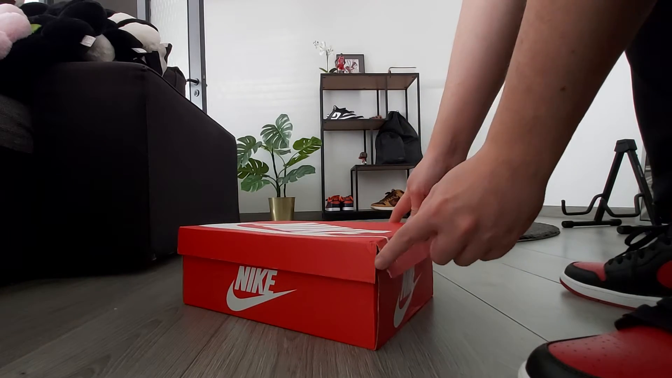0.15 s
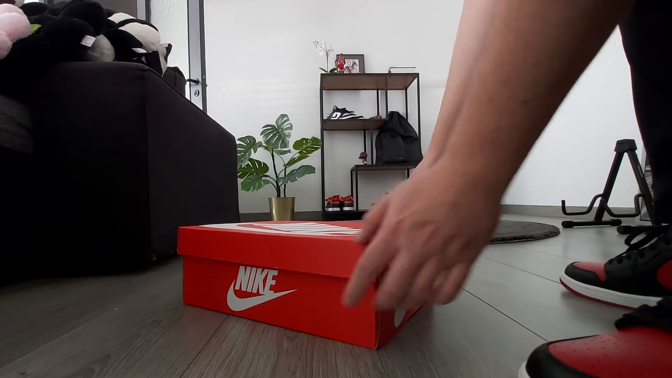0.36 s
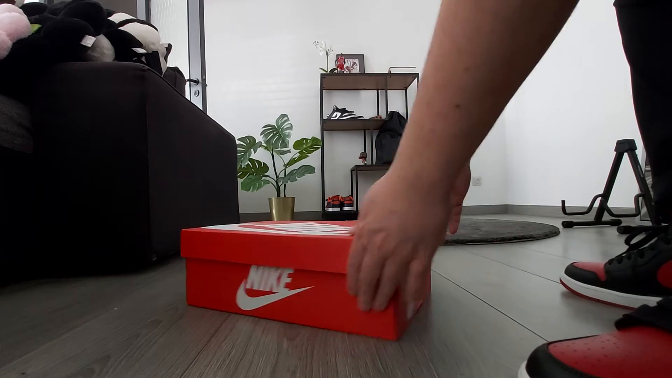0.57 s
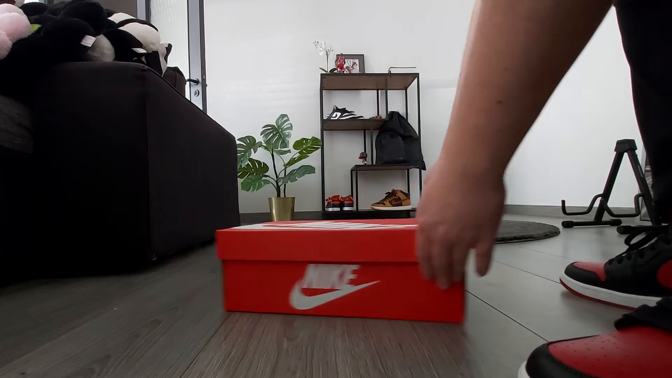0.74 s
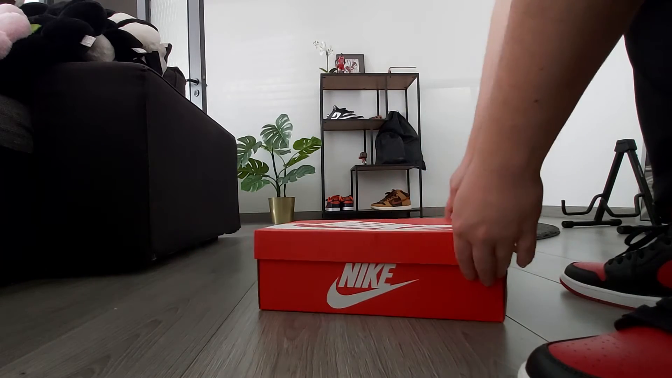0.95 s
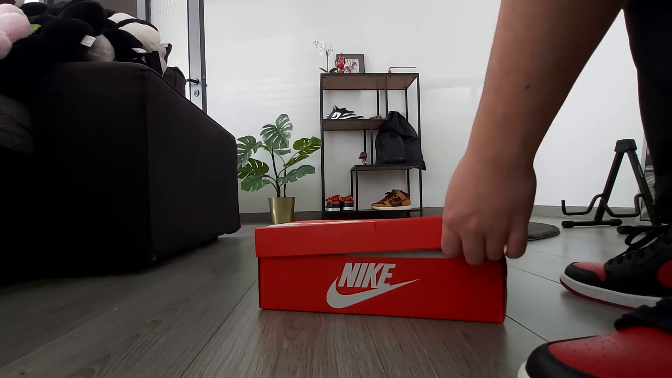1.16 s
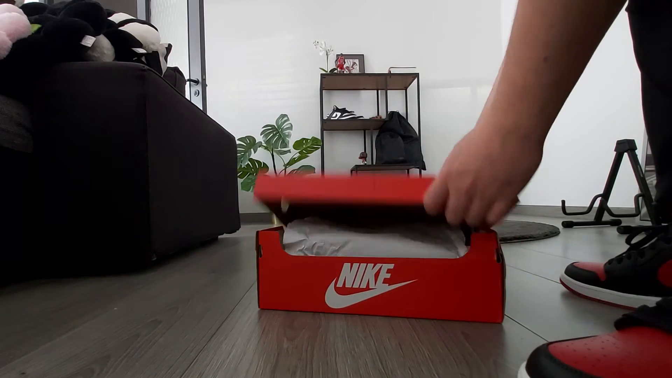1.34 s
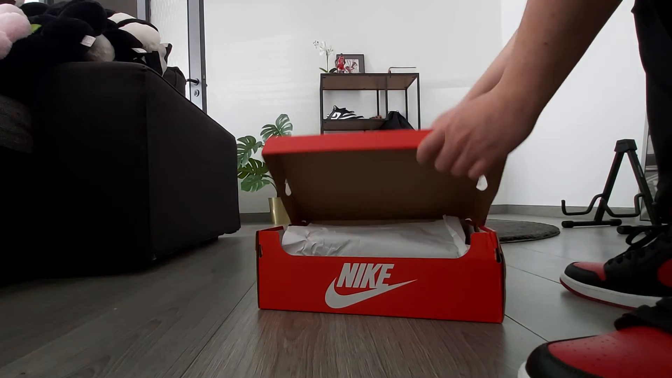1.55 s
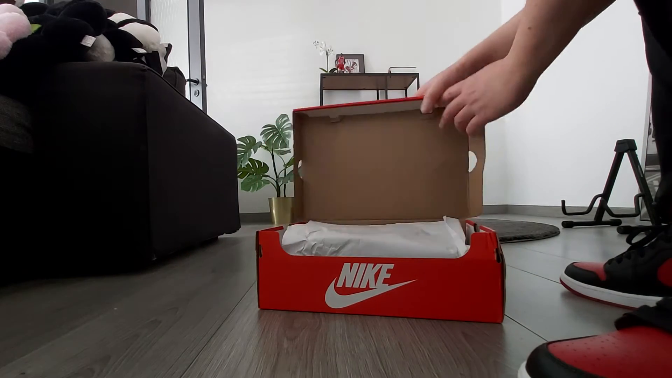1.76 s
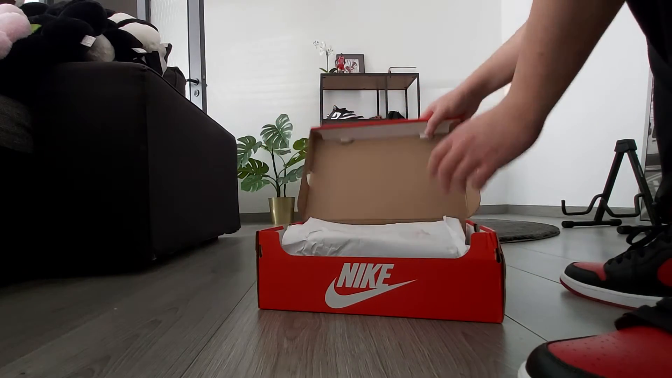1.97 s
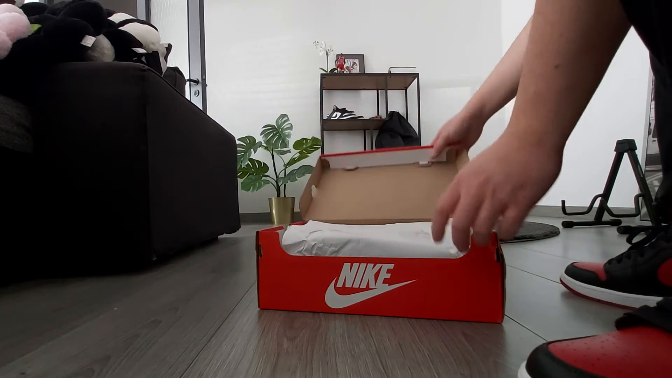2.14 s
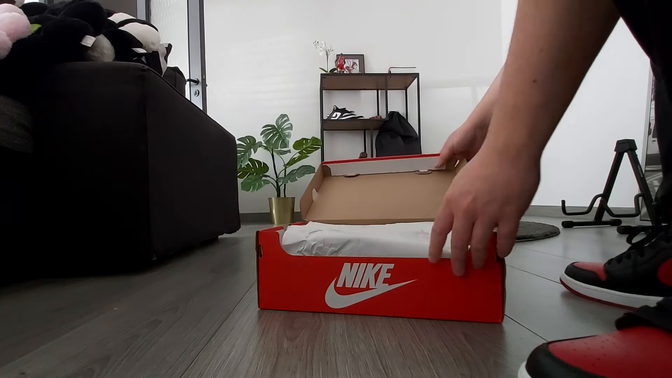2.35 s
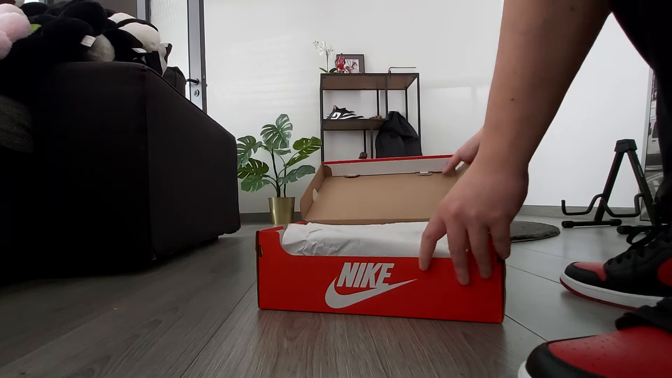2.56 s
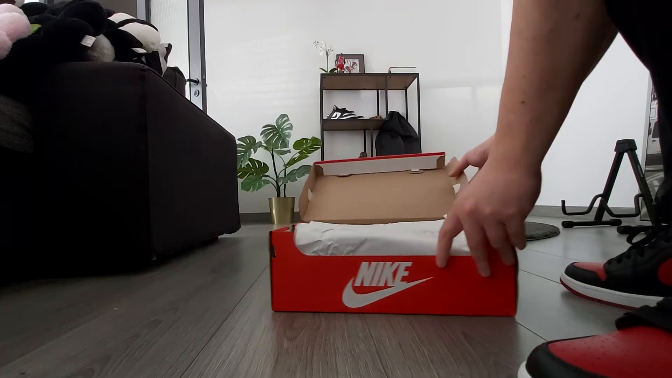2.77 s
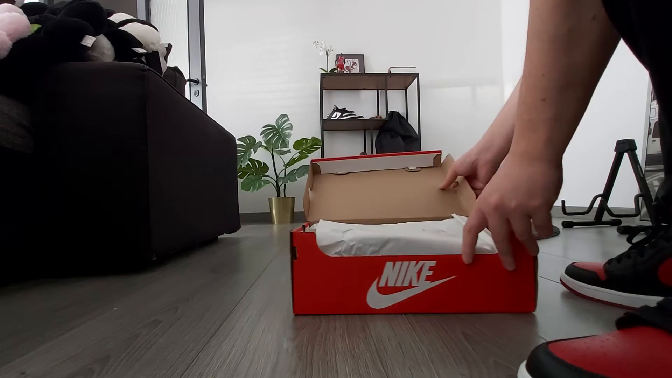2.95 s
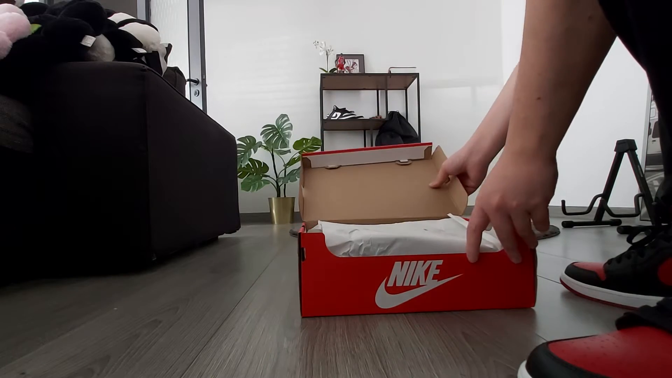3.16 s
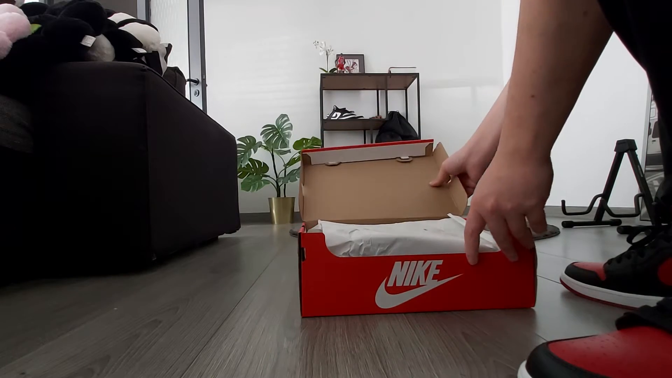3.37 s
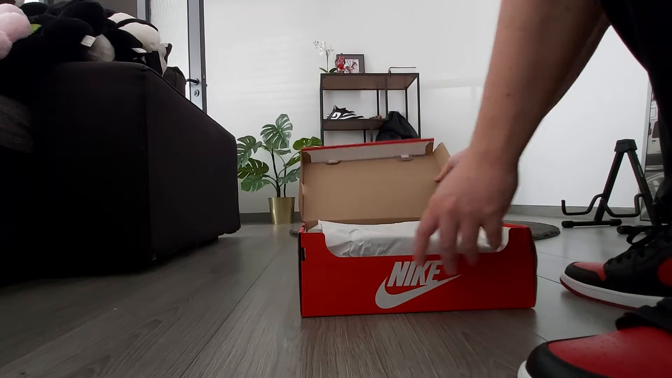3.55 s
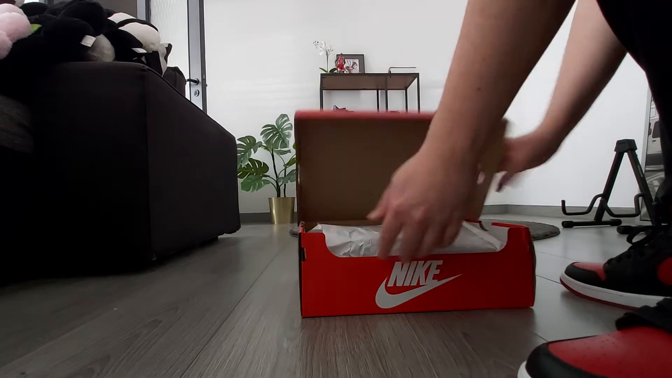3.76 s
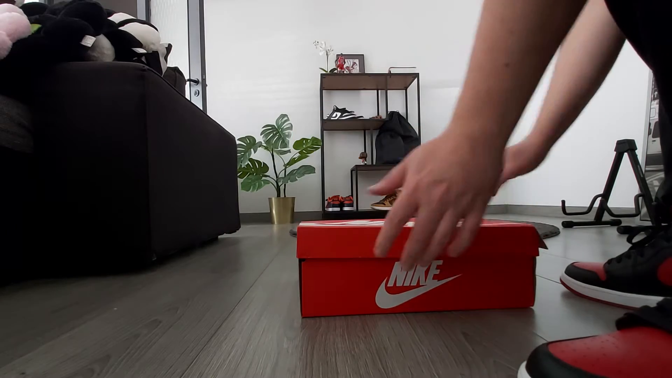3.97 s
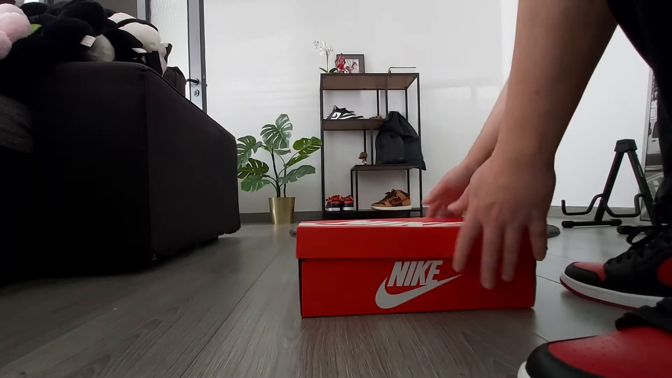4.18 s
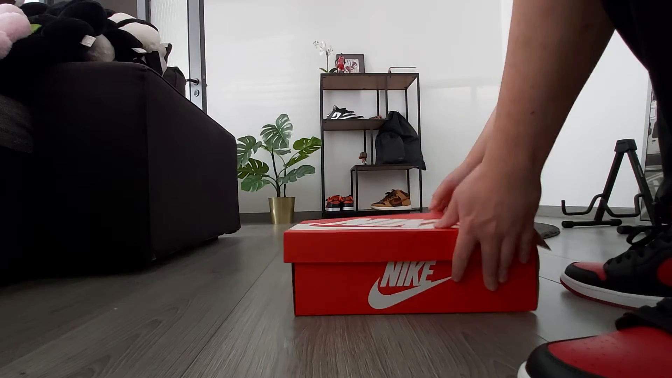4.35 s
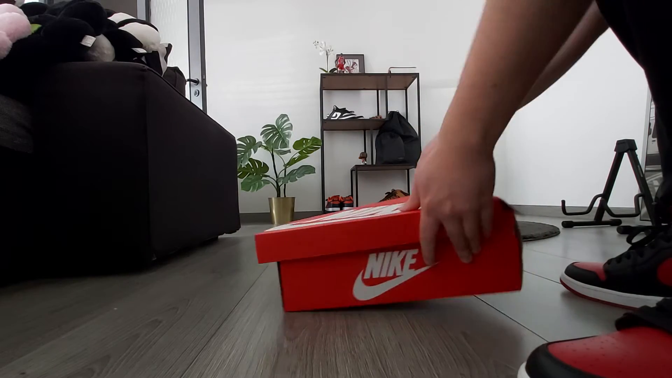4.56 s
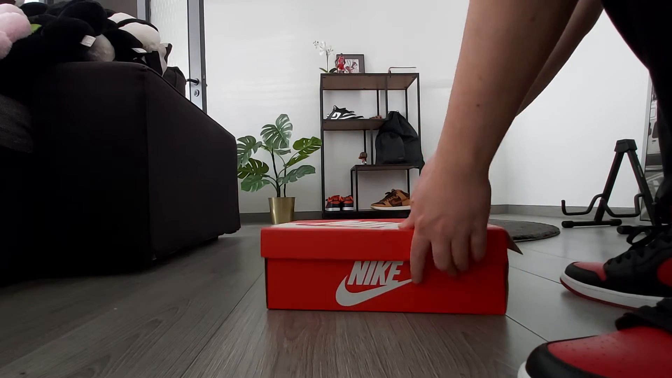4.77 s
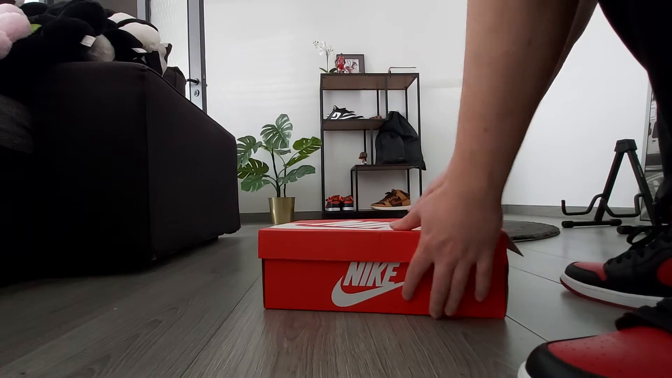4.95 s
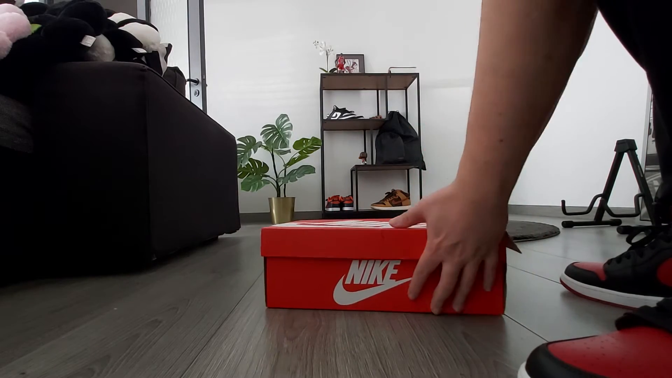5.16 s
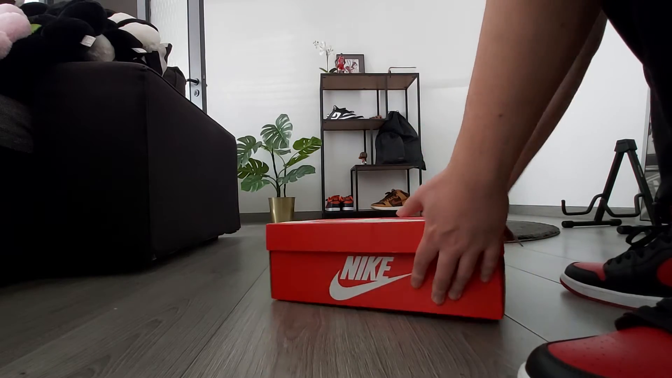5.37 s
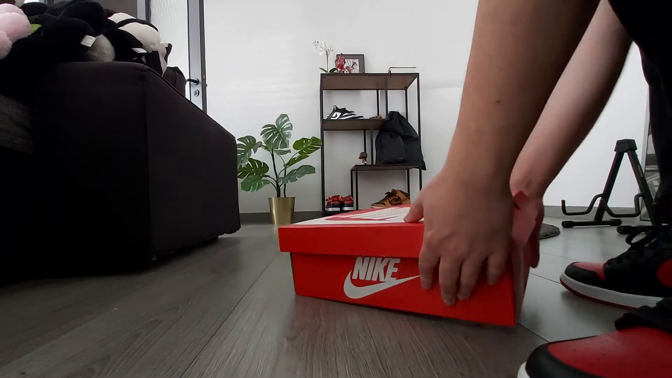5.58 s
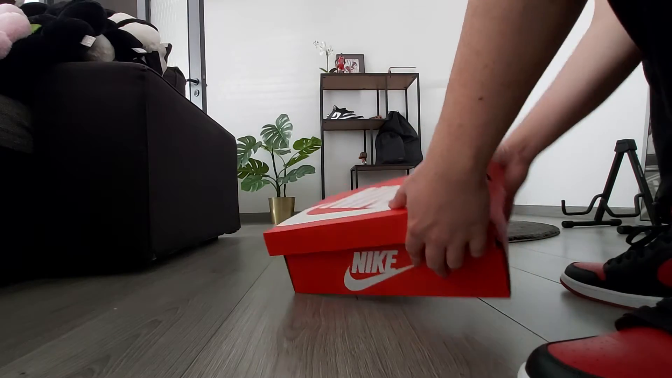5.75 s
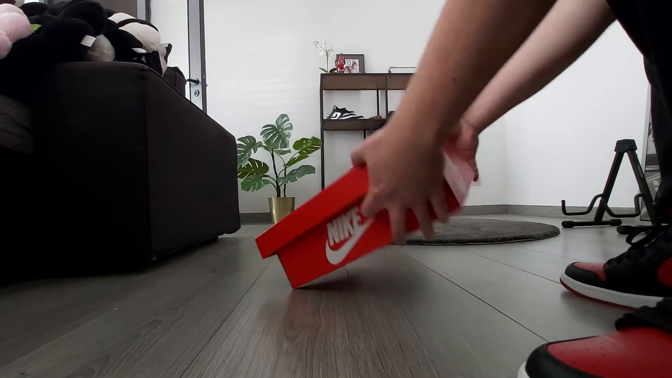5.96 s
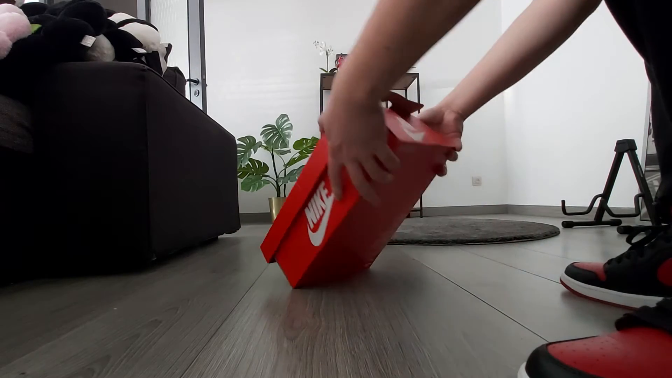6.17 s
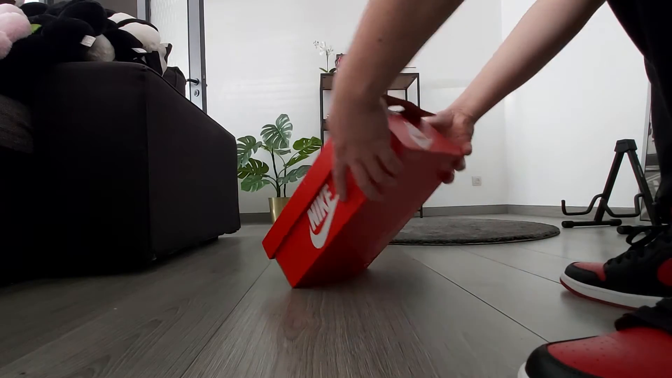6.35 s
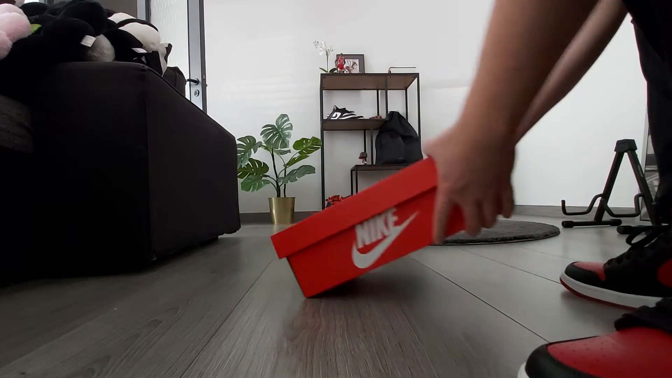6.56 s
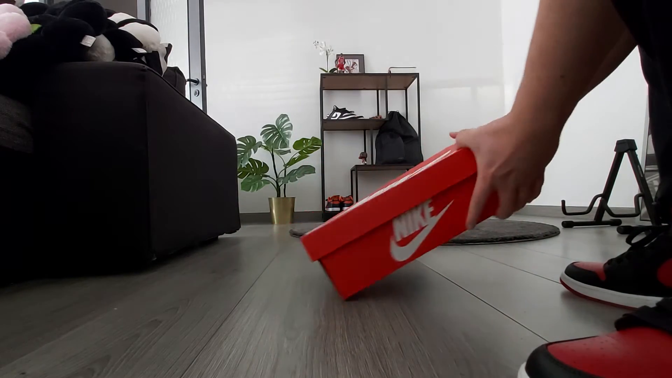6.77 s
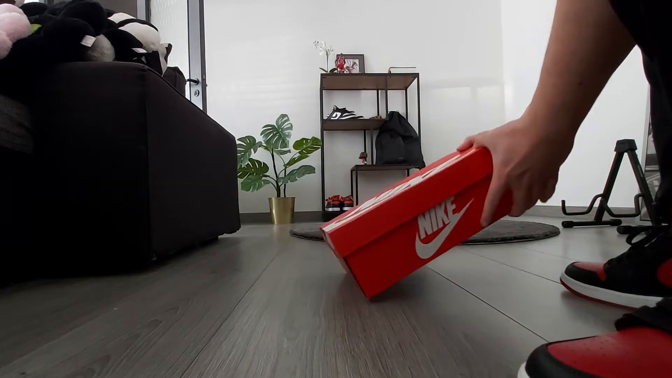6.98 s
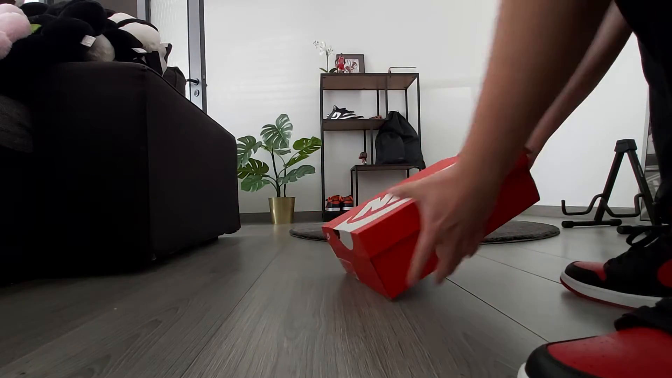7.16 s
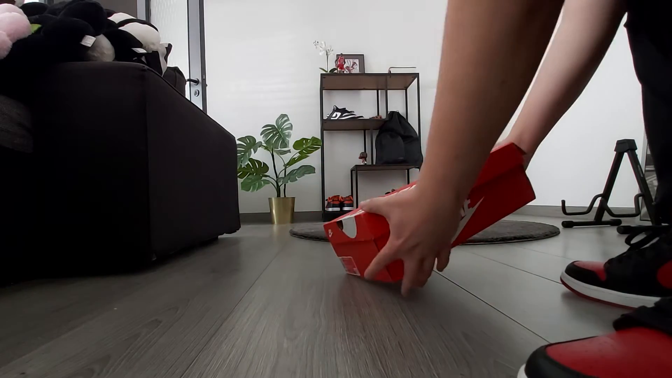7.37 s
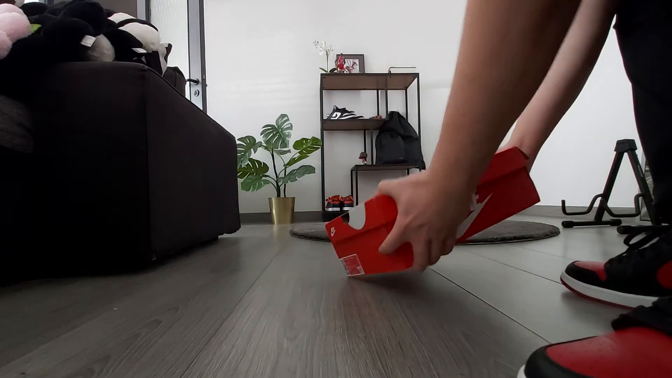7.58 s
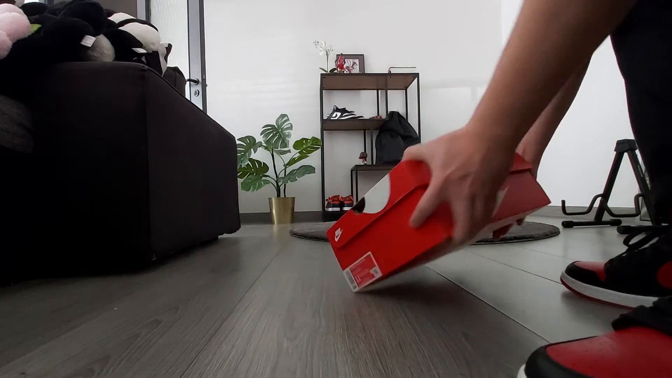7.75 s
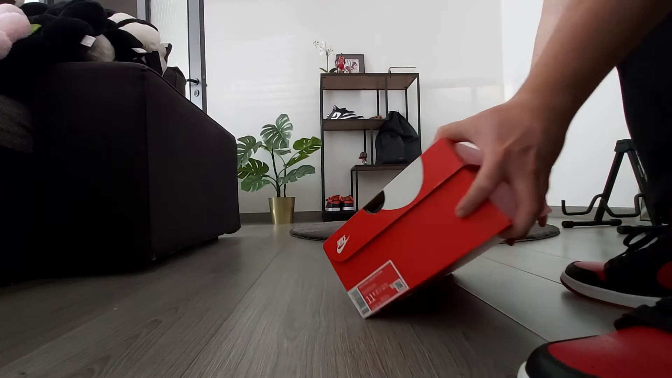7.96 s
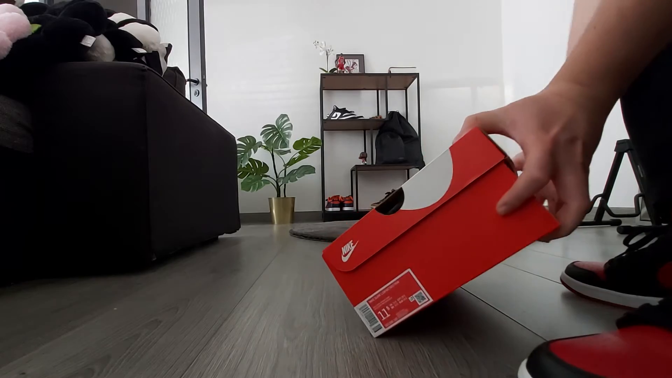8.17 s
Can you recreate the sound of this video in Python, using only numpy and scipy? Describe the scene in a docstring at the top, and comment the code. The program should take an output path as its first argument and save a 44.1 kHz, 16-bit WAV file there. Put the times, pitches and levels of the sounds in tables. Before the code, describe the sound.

Close rubbing and papery rustle of a card box on a hard floor, a cluster of sharp boxy knocks midway, then scrapes while tilting.

```python
"""Cardboard shoebox handled on a hard floor

Hands slide, open, shut, lift and tilt the box close to a stereo microphone.
Stick-slip noise makes the rubbing; short contacts make knocks and scuffs; all ring the same card modes.
The air in the box booms low on its own modes; a furnished room answers with sparse reflections.
"""
import sys
import numpy as np
from scipy import signal
from scipy.fft import rfft, irfft, next_fast_len
from scipy.io import wavfile
from scipy.ndimage import uniform_filter1d, map_coordinates

SR = 44100
rng = np.random.default_rng(int(sys.argv[2]) if len(sys.argv) > 2 else 0)


def materialize(psi):
    """Save the field psi as 16-bit PCM at rate SR to the path in sys.argv[1].

    A 1-D psi becomes a single channel; in a 2-D psi each row is a channel.
    """
    bounded = np.clip(np.atleast_2d(psi).T, -1, 1)
    quanta = np.round(bounded * 32767).astype(np.int16)
    wavfile.write(sys.argv[1], SR, quanta)


N = 362502


def gain_of(db):
    """Decibels to a factor."""
    return 10 ** (np.asarray(db) / 20)


def evened(x):
    """Scales to rms 1."""
    return x / np.sqrt(np.mean(x ** 2) + 1e-20)


def peaked(x):
    """Scales to peak 1."""
    return x / (abs(x).max() + 1e-20)


def read(points, hz, axis=1):
    """Interpolates one column of a table on a log-frequency axis."""
    columns = np.transpose(points)
    return np.interp(np.log(hz + 1), np.log(columns[0] + 1), columns[axis])


def add(mix, start_s, sound):
    """Mixes a sound in at a time."""
    part = mix[round(start_s * SR):][:len(sound)]
    part += sound[:len(part)]


def coloured(x, points):
    """Weights a signal's spectrum by a table, then rms 1."""
    size = next_fast_len(len(x))
    weight = gain_of(read(points, np.fft.rfftfreq(size, 1 / SR)))
    return evened(irfft(rfft(x, size) * weight, size)[:len(x)])


def ring(modes, weights, size):
    """Sum of exponentially dying sines, peak 1."""
    hz, db, t60_s = np.transpose(modes)[:, :, None]
    t = np.arange(size) / SR
    decay = gain_of(db - 60 * t / t60_s)
    out = weights @ (decay * np.sin(2 * np.pi * hz * t))
    return out / abs(out).max()


def rung(x, modes):
    """Drives a set of modes with a signal, rms 1."""
    return evened(signal.oaconvolve(x, ring(modes, np.ones(len(modes)), 16384))[:N])


# strokes of card and hands: full level at t/s, rise/s, hold/s, fall/s,
# floor drag level/dB, wall rumble level/dB, skin and paper hiss level/dB
STROKES = [(0.0, 0.016, .02, 0.055, -57, -44, -65.5), (0.182, 0.036, 0.08, 0.04, -62, -49, -65),
           (0.343, .02, 0.11, 0.19, -63.5, -90, -65.5), (0.576, 0.03, 0.018, .07, -41.5, -47, -63),
           (0.674, 0.12, 0.14, 0.18, -35, -42, -38.5), (0.851, .08, 0.059, 0.1, -38.5, -38, -54),
           (1.031, 0.14, 0.28, 0.092, -52.5, -52.5, -56), (1.331, 0.016, 0.0062, 0.15, -41, -42, -45.5),
           (1.495, .05, 0.017, 0.14, -50.5, -53, -52.5), (1.783, 0.12, 0.036, 0.054, -48.5, -48.5, -46),
           (2.02, 0.33, 0.081, 0.22, -60, -59, -52.5), (2.39, 0.044, 0.079, 0.099, -57, -55, -57.5),
           (2.54, 0.085, 0.12, .07, -49, -46, -51), (2.715, 0.03, 0.0086, 0.065, -35, -34, -46),
           (2.777, 0.17, 0.041, 0.25, -40, -51.5, -45), (2.968, .11, 0.086, 0.17, -48.5, -47.5, -53),
           (3.19, 0.13, .11, 0.12, -66, -64, -93), (3.457, 0.035, 0.039, 0.075, -54.5, -65, -53.5),
           (3.627, 0.094, 0.061, 0.045, -60.5, -57, -69), (3.741, 0.099, 0.042, 0.054, -54.5, -57, -50.5),
           (3.84, .06, .04, .05, -51, -47.5, -56), (3.925, 0.037, .01, 0.09, -40, -35.5, -44),
           (4.393, 0.081, 0.026, 0.13, -36.5, -41.5, -37.5), (4.446, .05, 0.039, 0.055, -36, -39.5, -44.5),
           (4.542, 0.091, 0.28, .04, -42.5, -43.5, -49), (5.003, 0.092, 0.011, 0.052, -49.5, -62, -53),
           (5.417, 0.35, 0.18, 0.042, -40.5, -46.5, -46.5), (5.628, 0.0067, 0.017, 0.2, -36, -41.5, -44.5),
           (5.845, 0.12, 0.072, 0.098, -53.5, -53.5, -75), (6.017, 0.23, 0.041, 0.1, -42.5, -47, -48),
           (6.101, 0.047, 0.11, 0.23, -39.5, -47, -44.5), (6.224, 0.018, 0.017, 0.066, -33.5, -43.5, -47),
           (6.513, 0.21, 0.052, 0.22, -36.5, -47.5, -48), (6.847, 0.048, 0.017, 0.091, -37.5, -40, -46),
           (6.95, 0.046, 0.042, 0.21, -54, -49, -53.5), (7.504, 0.094, .02, 0.13, -58, -50.5, -61),
           (7.6, .11, 0.046, 0.092, -43, -47.5, -54), (7.756, 0.18, 0.089, 0.27, -25, -35.5, -35.5),
           (7.924, .09, 0.056, 0.06, -30.5, -31.5, -39), (8.074, 0.19, 0.11, 0.18, -45, -39.5, -47.5)]
ROUNDNESS = 1.116  # 1 = pointed flanks, 2 = rounded; rise and fall each span 20 dB
# settling under the jolt: drag, rumble, hiss level/dB
SETTLE_DB = (-15.5, -7, -6.5)
SETTLE_S = 0.12  # time to fall 20 dB
CRISP = 0.67  # share of the crack, against the thump, in the jolt that sets the hiss
HUM_DB = -10.5  # air, relative to the wall rumble


def gestures():
    """Levels over time: powers of all strokes, and of the contents shifting after each knock, add up."""
    t = np.arange(0, N + 64, 64) / SR
    power = np.zeros((3, len(t)))
    for full_s, rise_s, hold_s, fall_s, *db in STROKES:
        before = (full_s - t) / rise_s
        after = np.maximum(t - full_s - hold_s, 0) / fall_s
        away = np.where(t < full_s, before, after)
        power += gain_of(np.c_[db] - 20 * np.minimum(away, 9) ** ROUNDNESS) ** 2
    for start_s, _, _, thump_db, _, crack_db in KNOCKS:
        hiss_jolt_db = thump_db + CRISP * (crack_db - thump_db)
        jolt_db = np.c_[[thump_db, thump_db, hiss_jolt_db]]
        settle_db = jolt_db + np.c_[list(SETTLE_DB)] - 20 * abs(t - start_s) / SETTLE_S
        power += (t > start_s) * gain_of(settle_db) ** 2
    drag, rumble, hiss = (np.interp(np.arange(N) / SR, t, np.sqrt(p)) for p in power)
    return drag, rumble, hiss, gain_of(HUM_DB) * rumble


def grit(per_s, spread_db, smooth):
    """Stick and slip: sparse clicks of uneven size over a share of smooth noise."""
    height = gain_of(spread_db * np.minimum(rng.exponential(1, N), 5)) * rng.standard_normal(N)
    clicks = evened(height * (rng.random(N) < per_s / SR))
    return evened(clicks + smooth * rng.standard_normal(N))


def lumps(ms, depth_db):
    """Uneven pressure of the hands, as a wavering gain."""
    span = max(round(ms * SR / 1000), 2)
    wander = uniform_filter1d(uniform_filter1d(rng.standard_normal(N), span), span)
    return gain_of(depth_db * evened(wander))


def patches(frames, bins, depth_db):
    """Contact spots wander over the card, so bands swell and fade on their own."""
    field = rng.standard_normal((N // 128 + 2, 257)).T
    for _ in range(2):
        field = uniform_filter1d(uniform_filter1d(field, round(frames), 1), round(bins), 0)
    return evened(gain_of(depth_db * evened(field)))


# air in the box: f/Hz, level/dB, t60/s
AIR = [(70, -7, .2), (103, 0, .4), (128, -11, .15)]


def pumped(drive):
    """The flexing walls keep the air ringing at a fairly even height."""
    swing = signal.hilbert(rung(drive, AIR), next_fast_len(N))[:N]
    return evened(swing.real / (abs(swing) + 0.21))


# cardboard walls: f/Hz, level/dB, t60/s
WALLS = [(178.3, 8.5, 0.051), (260, 1.5, 0.038), (318, 0.5, 0.049), (361.8, 4, 0.081), (404.6, 7.5, 0.052),
         (490, -4.5, 0.042), (686, -0.5, 0.01), (784, -8, 0.042), (903, -6, 0.037), (1093, 2, 0.015),
         (1277, -5.5, 0.021), (1408, -5.5, 0.029), (1530, 10, 0.011), (1813, 2, 0.039), (2134, 10.5, 0.007),
         (2153, 18, 0.0049), (2740, -6, 0.0089), (3070, -2.5, 0.03), (4180, 7, 0.01)]
# spectrum of the floor drag: f/Hz, level/dB per Hz
DRAG = [(260, -16.5), (450, -1.5), (591, -14.5), (687, -6), (939, -4.5), (1090, -6.5), (1770, -10.5),
        (2650, -17), (3110, -18), (5000, -29), (6500, -48.5), (11000, -120)]
# spectrum of the wall rumble: f/Hz, level/dB per Hz
RUMBLE = [(82, -15), (140, -5), (211, -6.5), (269, 0), (351, -1), (429, -7), (470, -8.5), (600, -7.5),
          (780, -47.5), (1320, -120)]
# spectrum of the skin and paper hiss: f/Hz, level/dB per Hz
HISS = [(1290, -47.5), (2200, -20), (2450, -6), (3270, -10), (4070, -10), (5800, -9), (6870, -12.5),
        (8690, -18), (12600, -15), (15000, -19), (16100, -18.5), (16500, -45)]


def handling(levels, pressure, spots):
    """Friction drives the walls; part rings in their modes, part leaves as plain scrape."""
    drag, rumble, hiss, hum = levels
    slips = grit(1800.0, 3.7, 1.8) * pressure
    ringing = evened(np.diff(rung(slips, WALLS), prepend=0))
    scrape = coloured(slips + 0.16 * ringing, DRAG)
    low = rng.standard_normal(N) * pressure
    boxy = coloured(low + 0.17 * rung(low, WALLS), RUMBLE)
    fizz = coloured(grit(1700.0, 6.7, 3.3) * pressure ** 0.78, HISS)
    z = signal.stft([scrape, fizz], nperseg=512, noverlap=384)[2]
    z = z * spots[:, :z.shape[2]]
    scrape, fizz = signal.istft(z, nperseg=512, noverlap=384)[1][:, :N]
    return drag * scrape + rumble * boxy + hiss * fizz + hum * pumped(low)


def favoured(pitch_hz, octaves, luck, size):
    """Ring of the small panels: those near the contact's pitch lead, the spot sets share and sign."""
    hz = np.transpose(WALLS)[0]
    near = (hz > 520) / (1 + (np.log2(hz / pitch_hz) / octaves) ** 2)
    return ring(WALLS, -near * gain_of(2.5 * luck) * np.sign(luck[::-1] + .7), size)


# knocks: t/s, rap level/dB, pitch the contact favours f/Hz, thump level/dB, air boom level/dB, crack level/dB
KNOCKS = [(0.172, -30, 690, -36, -40, -74), (0.187, -21, 665, -34, -41, -77),
          (0.498, -27, 810, -44, -58, -56), (0.509, -30.5, 675, -32, -35, -52.5),
          (0.568, -27.5, 760, -39, -40, -58), (1.196, -50, 700, -42, -65, -75),
          (1.346, -24.5, 950, -45, -25.5, -41), (1.357, -30, 1540, -36, -16, -65),
          (1.39, -48, 807, -49, -25, -40.5), (1.617, -47, 2710, -56, -66, -45.5),
          (2.321, -60, 700, -46.5, -66, -72), (2.374, -44, 1060, -39.5, -64, -73),
          (2.706, -37, 886, -45, -41, -46), (2.724, -16.5, 1670, -52, -49, -54),
          (3.684, -28, 885, -29.5, -40, -57), (3.875, -32, 894, -38.5, -41, -45.5),
          (4.217, -33, 780, -23, -25, -49.5), (4.238, -21.5, 790, -24.5, -49, -45.5),
          (4.276, -14, 890, -23, -21, -58.5), (4.29, -16, 870, -24, -42, -44),
          (4.301, -20.5, 1250, -21.5, -20, -41.5), (4.41, -15.5, 1000, -49, -41, -26.5),
          (4.509, -7, 1750, -71, -51, -15.5), (4.679, -11, 1500, -21, -13, -33),
          (4.687, -2.5, 936, -34, -30, -47), (4.696, -5.5, 925, -14, -12.5, -41.5),
          (4.831, -8, 1550, -18, -22.5, -34.5), (4.998, -44, 930, -41, -41, -62),
          (5.129, -36, 703, -34, -28, -52.5), (5.496, -38, 740, -31.5, -50, -60),
          (5.534, -18.5, 824, -25.5, -39, -42), (5.543, -25, 800, -27, -33, -39),
          (5.604, -32, 912, -31, -42, -69), (5.621, -15, 830, -31, -31.5, -39),
          (5.732, -24.5, 1020, -44.5, -44, -48.5), (6.093, -4.5, 1130, -23, -36, -57),
          (6.101, -31, 719, -27, -31, -49), (6.225, -10, 1750, -31, -37, -50),
          (6.252, -21, 703, -31.5, -39, -49), (6.27, -19, 1050, -25.5, -37, -55),
          (7.489, -39, 4193, -67, -69, -35.5), (7.997, -19.5, 655, -23, -24, -42)]
# spectrum of the crack: f/Hz, level/dB per Hz
CRACK = [(1500, -35.5), (3000, 1.5), (5500, 5.5), (8000, -14), (12000, -6), (16000, -22.5)]
RATTLE_MS = 2.06  # decay time constant


def knocks():
    """A blow and brief rattle rap the small panels, thump the large ones, crack; the air swells after."""
    out, t = np.zeros(N), np.arange(2048) / SR
    large = np.transpose(WALLS)[0] < 520
    swell = 1 - np.exp(-np.arange(SR // 2) / SR / .006)
    fade = np.exp(-1000 * t / RATTLE_MS)
    chance = rng.standard_normal((len(KNOCKS), len(WALLS) + len(AIR) + len(t)))
    cracks = coloured(rng.standard_normal(len(KNOCKS) * len(t)), CRACK).reshape(-1, len(t))
    for knock, luck, crack in zip(KNOCKS, chance, cracks):
        start_s, rap_db, pitch_hz, thump_db, boom_db, crack_db = knock
        spot, puff = luck[:len(WALLS)], luck[len(WALLS):-len(t)]
        rattle = fade * luck[-len(t):] ** 3 * 0.034
        rattle[0] = 1  # the blow
        # soft card: the touch lasts 0.37 of a cycle
        contact = np.sin(np.pi * np.minimum(t[:128] * pitch_hz / 0.37, 1)) ** 2
        rap = signal.oaconvolve(np.convolve(rattle, contact), favoured(pitch_hz, 0.34, spot, size=2048))
        thump = ring(WALLS, large * gain_of(3.6 * spot) * np.sign(spot[::-1]), 12000)
        boom = swell * ring(AIR, gain_of(0.43 * puff), size=len(swell))
        crack = crack * fade * (1 - np.exp(-t / 0.0007))
        add(out, start_s, gain_of(rap_db) * peaked(rap))
        add(out, start_s, gain_of(thump_db) * np.sqrt(2) * thump)
        add(out, start_s, gain_of(boom_db) * np.sqrt(2) * boom)
        add(out, start_s, gain_of(crack_db) * crack / np.sqrt(np.mean(crack[:400] ** 2)))
    return out


# short swells of slips: t/s, scrape level/dB, pitch the contact favours f/Hz, hiss level/dB, time to peak/ms
SCUFFS = [(0.244, -38, 766, -56, 8.4), (1.241, -43, 2580, -55, 11), (1.335, -40, 915, -37, 4.5),
          (1.5, -37, 840, -54, 12), (1.718, -58, 2500, -42, 7.8), (2.521, -36.5, 1010, -62, 8.1),
          (2.544, -25.5, 1030, -68, 9), (2.714, -22, 795, -59, 3.9), (3.926, -21.5, 980, -41.5, 5.5),
          (4.368, -52, 970, -47, 8.0), (5.973, -34.5, 970, -49, 6.2), (5.994, -22.5, 900, -50.5, 6.1),
          (6.749, -34.5, 765, -57, 14), (6.835, -26, 954, -46, 12), (6.943, -29.5, 860, -66, 7.7)]


def scuffs():
    """An edge catches and slips free: a swell of noise through the small panels, plus hiss."""
    out, t = np.zeros(N), np.arange(4096) / SR
    chance = rng.standard_normal((len(SCUFFS), len(WALLS) + len(t)))
    hisses = coloured(rng.standard_normal(len(SCUFFS) * len(t)), HISS).reshape(-1, len(t))
    for (start_s, scrape_db, pitch_hz, hiss_db, peak_ms), luck, hiss in zip(SCUFFS, chance, hisses):
        u = 1000 * t / peak_ms
        swell = u * np.exp(1 - u)
        panels = favoured(pitch_hz, 0.24, luck[:len(WALLS)], size=2048)
        scrape = signal.oaconvolve(luck[len(WALLS):], panels)[:len(t)]
        add(out, start_s, swell * (gain_of(scrape_db) * peaked(scrape) + gain_of(hiss_db) * hiss))
    return out


# soft bumps of lid and walls that only push the air: t/s, boom level/dB
BUMPS = [(0.0, -41), (0.583, -37), (1.48, -35), (1.525, -37.5), (1.772, -41), (2.6, -38), (2.648, -33),
         (3.738, -37.5), (4.346, -25), (4.479, -32), (4.748, -10.5), (5.681, -42), (5.814, -34),
         (7.682, -34), (7.801, -30), (8.079, -28)]


def bumps():
    """A wall flexes without a rap; the air swells and rings out."""
    out = np.zeros(N)
    swell = 1 - np.exp(-np.arange(SR // 2) / SR / 0.0041)
    for (start_s, db), puff in zip(BUMPS, rng.standard_normal((len(BUMPS), len(AIR)))):
        boom = swell * ring(AIR, gain_of(1.3 * puff), size=len(swell))
        add(out, start_s, gain_of(db) * np.sqrt(2) * boom)
    return out


# spectrum of the room air: f/Hz, level/dB per Hz
HUSH = [(15, -47.5), (25, -11), (114, 5.5), (206, -0.5), (293, 6.5), (659, -13.5), (936, -9.5), (1740, -25),
        (6050, -27), (8360, -31.5), (16000, -41)]
HUSH_DB = -60.5  # rms


def hush():
    """Quiet room air: steady coloured noise."""
    return gain_of(HUSH_DB) * coloured(rng.standard_normal(N), HUSH)


# reverberation: f/Hz, t60/s, power share
ROOM = [(80, 0.26, 0.14), (300, 0.32, 0.11), (1020, 0.24, 0.17), (2980, 0.39, 0.04), (10440, 0.16, 0.0093)]
# direction of the box: t/s, left lag/samples
PLACE = [(0, -4), (1, 3), (2.2, 3.5), (4.2, 5), (4.7, 5), (5.2, 1), (6.201, 0), (7.2, -1.5), (8.2, -1.5)]


def room(x, other):
    """Direct sound, left lagged by the box's place, right as given, plus sparse decaying reflections."""
    taps = np.zeros((2, SR // 2))
    at = np.arange(200, SR // 2 - 20, 20)
    at = at + rng.integers(0, 20, (2, len(at)))
    np.put_along_axis(taps, at, rng.choice([-1., 1.], at.shape), 1)
    hz, t, z = signal.stft(taps, SR, nperseg=512)
    z = z * gain_of(-60 * t / read(ROOM, hz)[:, None])
    z = z / np.sqrt((abs(z) ** 2).sum(2, keepdims=True))  # equal energy per band
    tail = signal.istft(z, SR, nperseg=512)[1]
    tail = tail / np.linalg.norm(tail, axis=1, keepdims=True)
    wet = signal.fftconvolve(x[None], tail, axes=1)[:, :N]
    lag = np.interp(np.arange(N) / SR, *np.transpose(PLACE))
    direct = np.array([map_coordinates(x, [np.arange(N) - lag], order=3), other])
    size = next_fast_len(N)
    share = read(ROOM, np.fft.rfftfreq(size, 1 / SR), axis=2)
    mixed = np.sqrt(1 - share) * rfft(direct, size) + np.sqrt(share) * rfft(wet, size)
    return irfft(mixed, size)[:, :N]


# rubbing spreads over the box: f/Hz, left-right likeness (0 to 1)
ALIKE = [(100, 1), (500, 0.82), (1500, 0.64), (4000, 0.16), (12000, 0.14)]


def scene():
    """The box in the room over the quiet air; the right ear partly hears another patch of rubbing."""
    levels = gestures()
    pressure = lumps(8.0, 1.0)
    spots = patches(12., 3., 1.9)
    near, far = (handling(levels, pressure, spots) + hush() for _ in "lr")
    size = next_fast_len(N)
    alike = np.clip(read(ALIKE, np.fft.rfftfreq(size, 1 / SR)), 0, 1)
    right = irfft(alike * rfft(near, size) + np.sqrt(1 - alike ** 2) * rfft(far, size), size)[:N]
    hits = knocks() + scuffs() + bumps()
    return room(near + hits, right + hits)


# channel balance: f/Hz, left minus right level/dB
BALANCE_DB = [(60, -3.), (300, -4), (1500, -2.5), (5000, -4.5), (14000, -1.5)]
BASS_CUT_HZ, EDGE_HZ = 54., 16100


def record(dry):
    """The left port hears less, the capsule drops deep bass, the input rounds peaks; then the band limit."""
    size = next_fast_len(N)
    tilt = gain_of(read(BALANCE_DB, np.fft.rfftfreq(size, 1 / SR)) / 2)
    ports = irfft(rfft(dry, size) * [tilt, 1 / tilt], size)[:, :N]
    ports = signal.sosfilt(signal.butter(4, BASS_CUT_HZ, "high", fs=SR, output="sos"), ports)
    ports = np.tanh(ports)
    lowpass = signal.firwin(511, EDGE_HZ, window=("kaiser", 9), fs=SR)
    return signal.oaconvolve(ports, lowpass[None], "same")


dry = scene()
out = record(dry)
materialize(out)
```